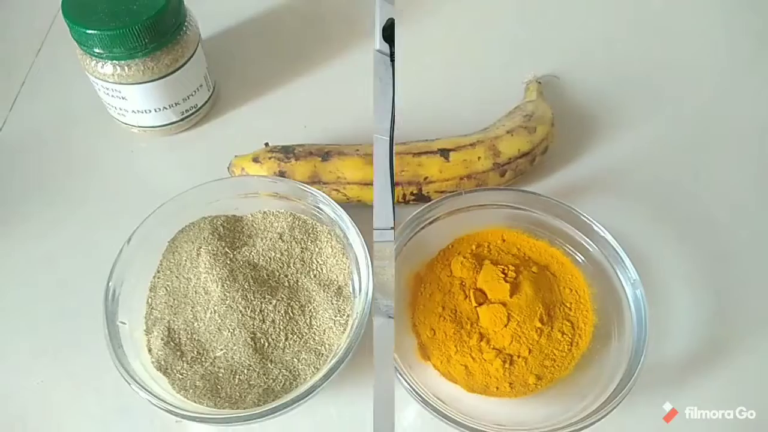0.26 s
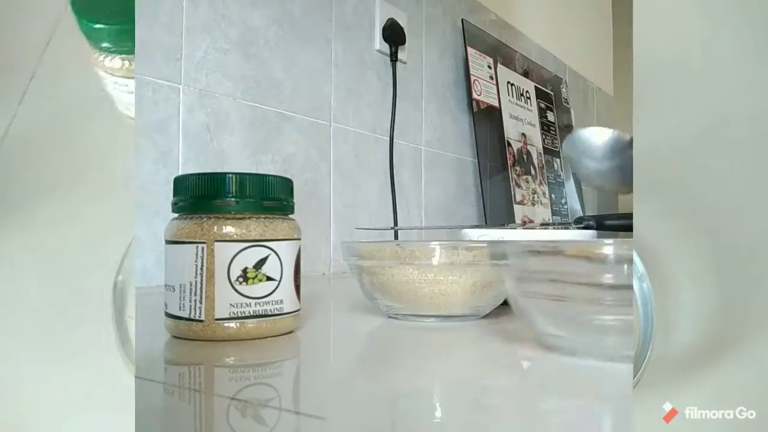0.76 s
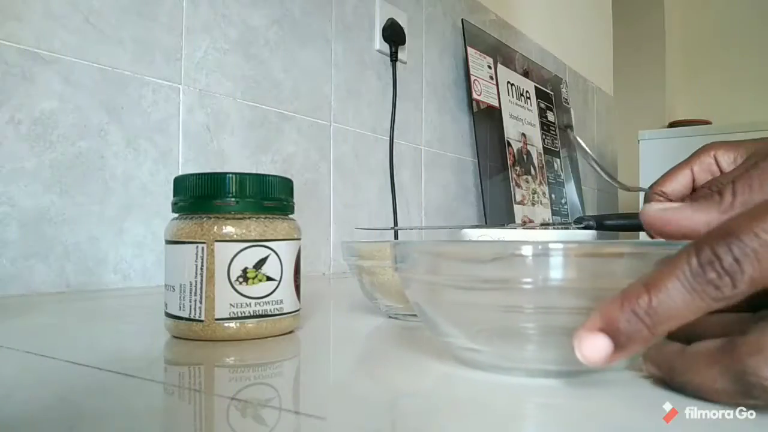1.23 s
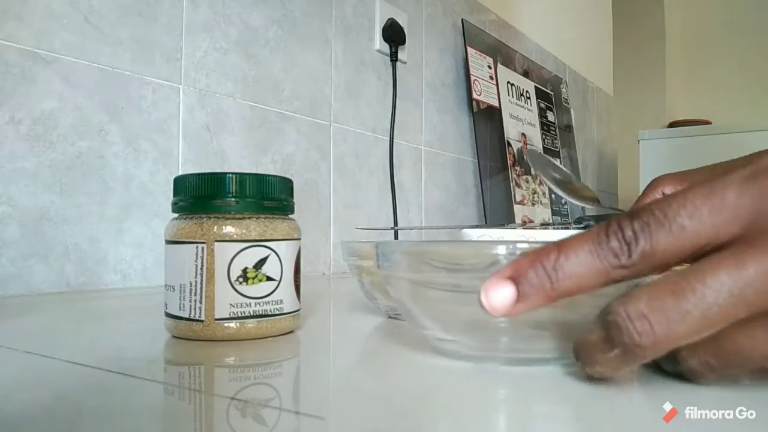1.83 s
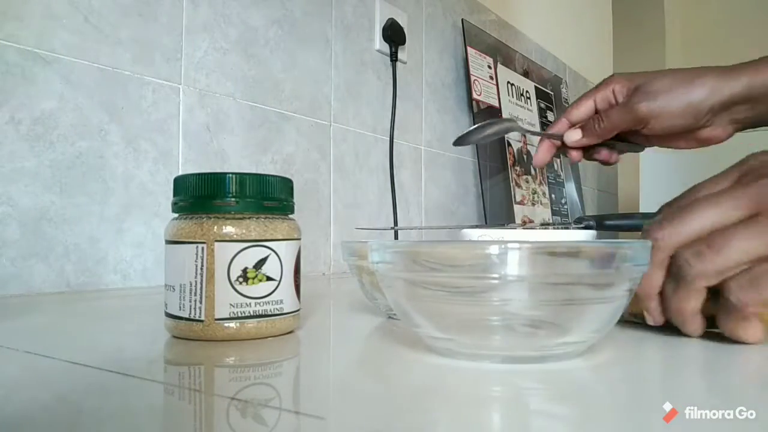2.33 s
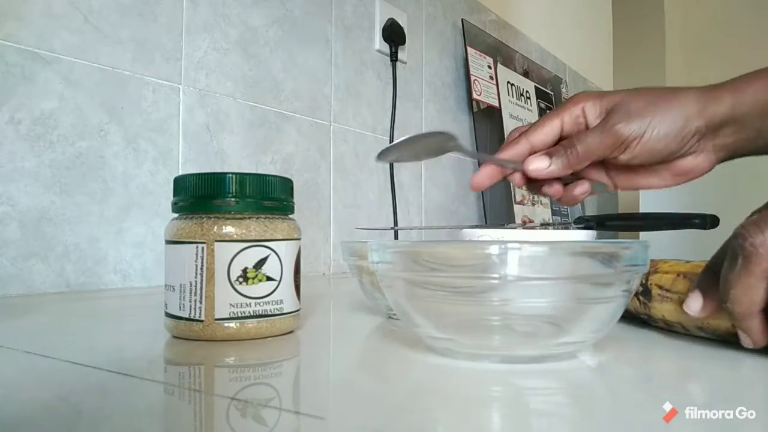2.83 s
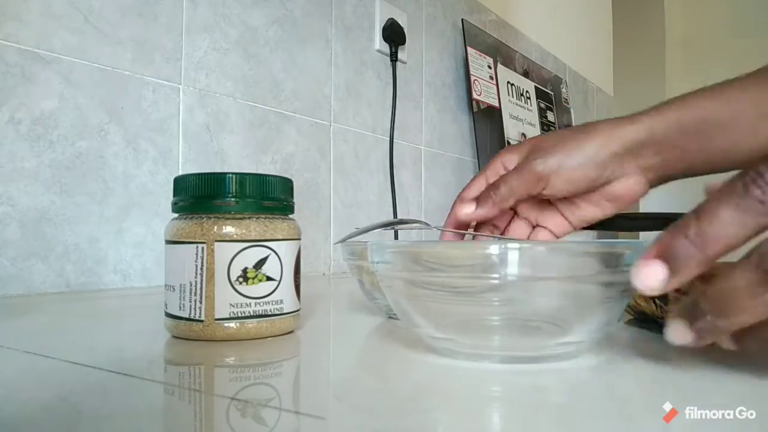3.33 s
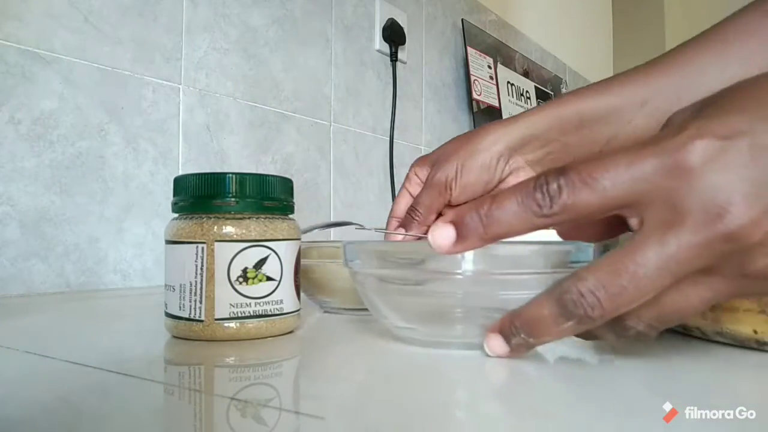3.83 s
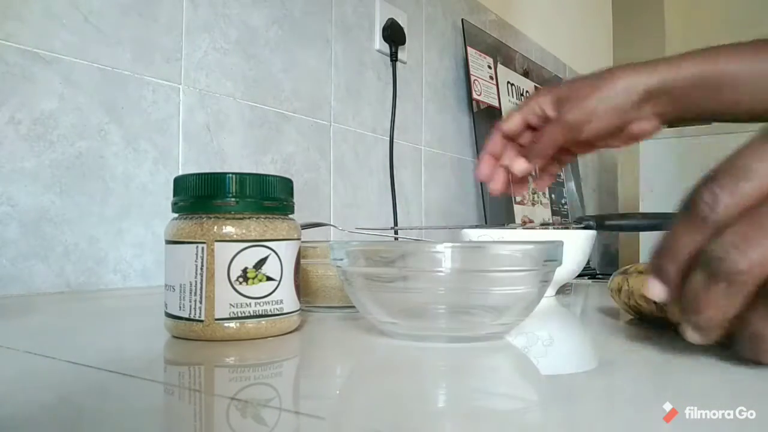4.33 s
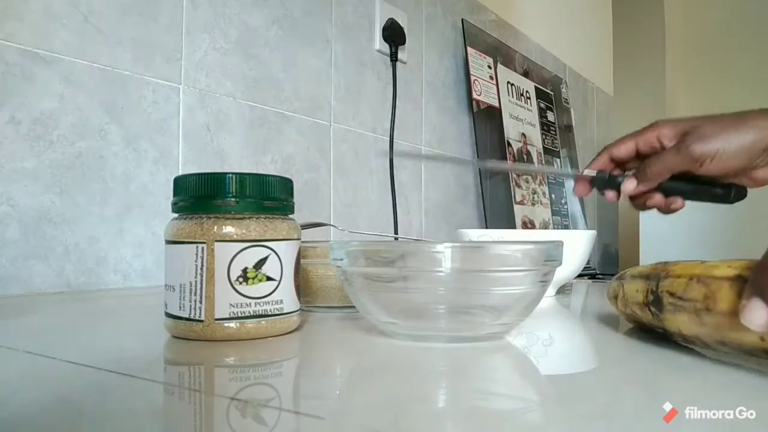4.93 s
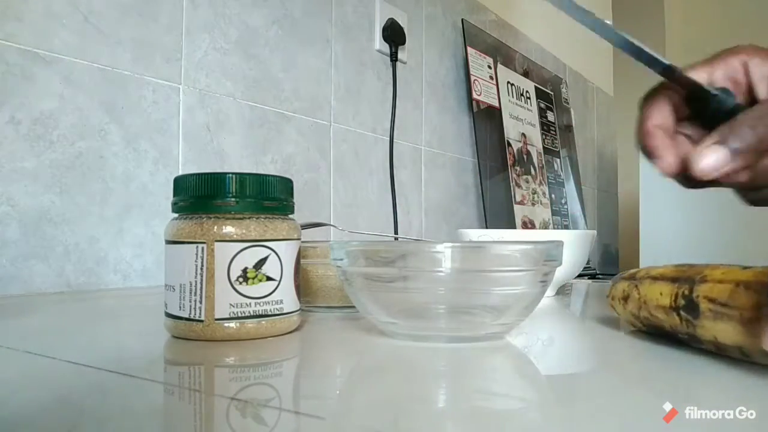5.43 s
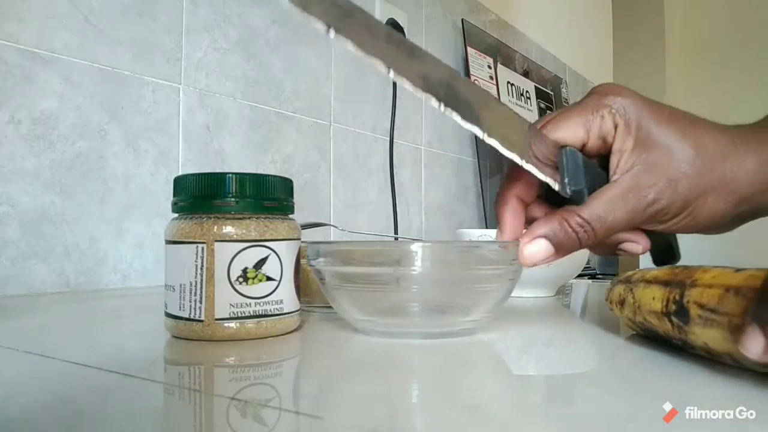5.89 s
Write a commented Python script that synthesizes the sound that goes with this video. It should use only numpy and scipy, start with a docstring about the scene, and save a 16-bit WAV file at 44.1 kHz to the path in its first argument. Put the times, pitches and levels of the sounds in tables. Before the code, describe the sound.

A glass bowl knocks and slides on a tiled counter, then a metal spoon clatters and a knife clinks over a faint low hum.

```python
"""First comes a wavering low hum with microphone hiss; it is cut for a moment and fades in again. Hands slide a
glass bowl over a tiled kitchen counter, drop a spoon onto that bowl and lift a knife off another. Knocks and
gritty rubbing make each thing ring at its own pitches, called modes. Small pings and a faint low note come and
go, and a small hard room adds a short echo."""
import sys
import numpy as np
from scipy import signal
from scipy.fft import rfft, irfft, next_fast_len
from scipy.io import wavfile
from scipy.ndimage import uniform_filter1d

SR = 44100
rng = np.random.default_rng(int(sys.argv[2]) if len(sys.argv) > 2 else 0)


def bounce(signal):
    """Save signal as a 16-bit WAV file at the path given by the first command-line argument."""
    frames = np.transpose(np.atleast_2d(signal))
    limited = np.clip(frames, -1, 1)
    pcm = np.round(limited * 32767).astype(np.int16)
    wavfile.write(sys.argv[1], SR, pcm)


N = 271435

# the room's lowest resonances (pitch [Hz], width [Hz], relative level [dB])
HUM_MODES = [(55, 25, -23.5), (70.5, 4.7, 4.5), (105.76, 14, 1), (142.4, 31, -2.5), (180.2, 36, -6.5),
             (291.5, 35, -22.5)]
# peaks of the deep hum, and the course of the upper hum (time [s], level [dB])
DEEP_SWELLS = [(.22, -32.5), (.65, -45), (1.13, -33), (1.68, -46), (2.3, -43.5), (2.86, -42.5),
               (3.63, -35.5), (3.9, -45), (4.62, -33.5), (5.05, -37.5), (5.3, -37), (5.74, -38),
               (6.12, -41)]
UPPER_HUM = [(0, -53), (.1, -54), (.24, -36.5), (.58, -44.5), (.9, -37.5), (1.55, -36.5), (2.2, -38),
             (2.9, -34.5), (3.8, -40.5), (4.4, -36.5), (4.6, -31.5), (4.8, -40), (5.05, -32), (6.15, -40.5)]
# tone colour of the hiss and of each kind of contact noise (frequency [Hz], relative level [dB])
HISS_COLOUR = [(20, -2), (200, 5), (500, 2.5), (900, -6), (2000, -10), (5000, -11.5), (12700, -15),
               (12950, -31), (17000, -32)]
TILE_GRIT = [(200, -30), (350, -5), (700, 1.5), (1800, 3), (3000, -9), (4800, -13.5), (5500, -17),
             (8800, -28.5), (10000, -81.5), (20000, -76.5)]
DULL_GRIT = [(300, -62), (650, 11), (1700, 14.5), (2400, -42), (4000, -49), (20000, -62)]
STEEL_GRIT = [(250, -32.5), (400, -3), (1500, -3), (4000, -3.5), (9000, 0), (14000, -10), (15000, -15.5),
              (20000, -13)]
# small lone rings (time [s], level [dB], pitch [Hz], ring time [s]); a ring time is a fade of 60 dB
PINGS = [(0.129, -65.5, 4600, 0.4), (0.321, -49.5, 4546, 0.44), (.38, -51.5, 1014, 0.13),
         (1.80, -57, 2130, 0.14), (1.946, -46, 4120, 0.099), (2.41, -47, 540, .1),
         (2.41, -57.5, 3170, 0.17), (2.87, -54.5, 2070, 0.27), (3.66, -51, 3240, 0.065),
         (3.70, -34, 2580, 0.065), (3.733, -53, 3200, 0.29), (4.80, -36.5, 726, 0.11),
         (4.94, -49.5, 745, 0.083), (5.42, -55, 1720, 0.093)]
# how each thing rings (pitch [Hz], relative level [dB], ring time [s])
BOWL_MODES = [(322, -18.5, 0.029), (426, -5, 0.13), (700, -7.5, 0.09), (865, 3.5, 0.043), (1158, 4, .04),
              (1406, 4, 0.049), (1599, 4, .075), (1859, -5, .06), (2201, -3, 0.045), (2640, -8.5, 0.045),
              (3183, -3, 0.02), (3584, -9, 0.037), (4160, -6.5, 0.029), (4960, -14, 0.047),
              (6030, -26, .04), (7060, -24, 0.07), (9260, -25, 0.1), (12790, -24, .09), (15420, -37.5, .04)]
HANDLE_MODES = [(720, -14, 0.051), (1003, -0.5, 0.02), (1276, 3, 0.052), (1560, 3, 0.03), (1890, -25, 0.46),
                (2180, -16, 0.025)]
SPOON_MODES = [(763, -24.5, 0.052), (1175, -15, .05), (1534, -15, .05), (2464, -13, 0.12),
               (3374, -11, 0.11), (4170, -24, 0.076), (4466, -9, 0.11), (5520, -13.5, 0.15),
               (5820, -6.5, 0.14), (5900, -8, .1), (6270, -12, .08), (7046, -6.5, 0.028), (7240, -10, .08),
               (7753, -8, 0.12), (8190, -20, 0.066), (8980, -9.5, 0.074), (9950, -11, 0.092),
               (10590, -13, .06), (10760, -15.5, .08), (12000, -27, 0.089), (11520, 0, 0.07),
               (11500, -14, .07), (12730, -11, .1), (12770, -9, .08), (13400, -3.5, .08), (13120, -9, .08),
               (13600, -10.5, .08), (13630, -6, 0.071), (13800, -13, 0.072), (15100, -11.5, 0.071)]
CHINA_MODES = [(1090, -32, 0.053), (1400, -6, 0.059), (1525, -4, 0.078), (2123, -13.5, 0.056),
               (2794, -19, 0.071), (3280, -21, 0.072), (3760, -14.5, 0.18), (3852, -5, 0.25),
               (5440, -19.5, 0.05), (6030, -15, 0.068), (6700, -13, 0.041), (6750, 4, 0.069),
               (7500, -17.5, 0.046), (9030, -21, 0.13), (10340, -13, 0.13), (11660, -34, .08),
               (13230, -37.5, .08), (15100, -28, .04)]
BLADE_MODES = [(687, -8, 0.072), (1547, 8, 0.056), (1680, -15, 0.046), (1864, -14, 0.061),
               (3380, -3.5, 0.41), (4210, -13.5, 0.074), (6030, -13, 0.076), (6350, -13, .07),
               (7000, -25, .06), (8870, -18, 0.1), (10100, -34, 0.072), (11800, -26, 0.076),
               (12600, -41, 0.057), (14100, -36, .07), (14600, -27, 0.032), (15800, -45, 0.068)]
# knocks on each thing (time [s], level [dB], brightness [dB per octave])
BOWL_KNOCKS = [(0.904, -31.5, -7), (0.958, -28.5, 0.5), (.986, -1.5, -1.5), (1.027, -5.5, -4.5),
               (1.947, -33, 1), (1.987, -33.5, -12), (3.215, -14, -4.5), (3.308, -11.5, -3),
               (3.683, -41.5, -21), (3.7, -39, -12), (3.868, -22.5, 2.5), (3.895, -23, -7), (3.955, -23, 3),
               (3.989, -50, 9), (4.012, -38, 8.5), (4.134, -45, 13.5), (5.96, -40.5, 5.5)]
HANDLE_KNOCKS = [(1.483, -20, 0), (1.692, -45, 0)]
SPOON_KNOCKS = [(3.215, -11, 1.5), (3.237, -12, 0), (3.256, -29.5, 2), (3.27, -13, 1.5), (3.309, -5.5, -1),
                (3.322, -7.5, -6), (3.349, -1, -2), (3.706, -43, 0), (3.959, -51, 4.5), (4.691, -51, 6.5)]
CHINA_KNOCKS = [(5.005, -15, 0.95)]
BLADE_KNOCKS = [(6.081, -28.5, 4.5), (6.086, -16, 1.2), (6.146, -21, 0.91)]
# rubbing, one list for each slide or rattle (time [s], level [dB])
BOWL_SLIDES = [
    [(.86, -59), (.9, -31.5), (.95, -30), (.96, -21.5), (1.06, -37), (1.2, -43), (1.42, -54.5)],
    [(1.88, -58.5), (1.93, -51.5), (1.96, -41.5), (2.08, -50.5), (2.14, -77)],
    [(3.68, -67), (3.75, -43.5), (3.82, -42), (3.9, -33), (3.94, -39), (3.96, -30.5), (4.07, -36),
     (4.14, -35), (4.19, -41), (4.3, -81)],
    [(5.87, -53), (5.91, -47), (6.07, -45), (6.09, -35.5), (6.15, -39.5)],
]
SPOON_RATTLES = [
    [(3.213, -26.5), (3.28, -19.5), (3.305, -21.5), (3.315, -13.5), (3.37, -16.5), (3.41, -22),
     (3.47, -36.5)],
    [(3.957, -36.5), (3.99, -40.5), (4.09, -57.5)],
]
CHINA_RATTLE = [
    [(5.003, -26.5), (5.03, -38), (5.07, -45.5)],
]
# a faint note that comes and goes (time [s], hold [s], pitch [Hz], level [dB])
LOW_NOTES = [(1.04, 0.075, 427.8, -34), (1.18, 0.13, 424, -50.5), (1.9, 0.092, 430.4, -47.5),
             (2.27, 0.12, 428.4, -52), (2.39, 0.11, 429, -46.5), (2.61, 0.033, 453, -54),
             (2.76, 0.11, 449, -50.5), (2.95, 0.11, 426, -52), (3.08, 0.05, 493, -55.5),
             (3.689, 0.034, 376.5, -41.5), (3.95, .06, 429, -36), (4.08, 0.17, 411, -56),
             (4.3, 0.025, 486, -52), (4.56, .18, 426, -50), (4.82, 0.091, 422, -50),
             (5.22, 0.046, 418.6, -48), (5.59, .06, 320, -52), (5.86, 0.08, 336.7, -55)]
# how long the room echoes (frequency [Hz], ring time [s])
ROOM_RING_TIMES = [(300, 0.29), (1500, 0.36), (5000, 0.36), (12000, .3)]


def undb(db):
    """Turn decibels into a factor to multiply by."""
    return 10 ** (np.asarray(db) / 20)


def level(x, db):
    """Set a sound's average (RMS) level."""
    return x * undb(db) / np.sqrt(np.mean(x ** 2))


def mode(x, hz, ring_s):
    """One fading vibration; a push of 1 starts it ringing at a height of 1."""
    decay, turn = np.exp(-np.log(1000) / (max(ring_s, .004) * SR)), 2 * np.pi * hz / SR
    return signal.lfilter([np.sin(turn)], [1, -2 * decay * np.cos(turn), decay * decay], x)


def colour(x, points):
    """Shape a sound's bass and treble by (frequency [Hz], level [dB]) points."""
    hz, db = np.transpose(points)
    n = next_fast_len(len(x))
    freqs = np.maximum(np.fft.rfftfreq(n, 1 / SR), 1)
    return irfft(rfft(x, n) * undb(np.interp(np.log(freqs), np.log(hz), db)), n)[:len(x)]


def waver(per_second, size=N):
    """Random steps smoothed into a drift of roughly 1 either way."""
    step = int(SR / per_second)
    steps = np.repeat(rng.standard_normal(size // step + 1), step)
    return 1.2 * uniform_filter1d(uniform_filter1d(steps, step), step)[:size]


def hum():
    """Rumble rings the room's lowest modes, each wavering alone; the deepest swell fast, ebb slowly."""
    t, out = np.arange(N) / SR, 0
    rise_db_per_s, fall_db_per_s, rest_db = 121, 39, -54
    upper_db = np.interp(t, *np.transpose(UPPER_HUM))
    deep_db = np.minimum(upper_db, rest_db)
    for s, db in DEEP_SWELLS:
        swell_db = db - np.maximum(rise_db_per_s * (s - t), fall_db_per_s * (t - s))
        deep_db = np.maximum(deep_db, swell_db)
    for hz, width, db in HUM_MODES:
        ring_s = np.log(1000) / (np.pi * width)
        ring = mode(rng.standard_normal(N), hz, ring_s)
        ring = level(mode(ring, hz, ring_s / 2), db - 5.5)
        out = out + ring * undb((upper_db if hz > 95 else deep_db) + 2 * waver(per_second=5))
    return out


def microphone_hiss():
    """The microphone's own steady noise."""
    return level(colour(rng.standard_normal(N), HISS_COLOUR), db=-57.5)


def pings():
    """Short single rings here and there, each from one tiny push."""
    out = 0
    for s, db, hz, ring_s in PINGS:
        push = np.zeros(N)
        push[int(s * SR)] = undb(db)
        out = out + mode(push, hz, ring_s)
    return out


def rub_level(rubs):
    """How hard a thing is rubbed at each moment, in dB; silent between rubs."""
    db, t = np.full(N, -200.0), np.arange(N) / SR
    for rub in map(np.array, rubs):
        inside = (t >= rub[0, 0]) & (t <= rub[-1, 0])
        db[inside] = np.interp(t[inside], *rub.T)
    return db


def cracks(n, hits, knock_db, crack_db):
    """A burst of noise for each knock; with harder knocks it grows faster than the ring does."""
    growth, hard_knock_db = 1.38, -13.5
    blows = np.zeros(n)
    blows[hits] = undb(growth * (knock_db - hard_knock_db) + hard_knock_db + crack_db)
    age = np.arange(400) / (0.0013 * SR)  # the burst peaks after 1.3 ms
    return np.convolve(blows, np.e * age * np.exp(-age))[:n] * rng.standard_normal(n)


def knock_and_rub(modes, knocks, rubs, grit, spot_db, crack_db, grit_db, centre_hz,
                  brighten=0, wander_db=2):
    """Knocks and uneven scraping grains ring the modes; each knock also cracks, each rub also hisses."""
    times, knock_db, knock_bright = np.transpose(knocks)
    start = int(np.floor(4 * times[0] - .4) * SR / 4)  # work only on the stretch around the knocks
    end = min(int(np.ceil(4 * times[-1] + 2) * SR / 4), N)
    hits, n = (times * SR).astype(int) - start, end - start
    rub_db, firm_db = rub_level(rubs)[start:end], -37.5
    rub_bright = np.clip(brighten * (rub_db - firm_db), -13, 1.5)
    grains = rng.standard_normal(n)
    rough_db = 1.5 * np.minimum(rng.exponential(size=n), 4) + 1.8 * waver(per_second=140, size=n)
    grains = level(grains * undb(rough_db), 0)
    gains = undb(np.array(modes)[:, 1])
    spots = spot_db * rng.standard_normal((len(hits), len(modes)))  # each blow lands on another spot
    touch = np.hanning(int(0.0014 * SR))  # a blow lasts 1.4 ms, so the ring takes a moment to build
    rings = 0
    for k, (hz, _, ring_s) in enumerate(modes):
        octaves = np.log2(hz / centre_hz)
        height = max(octaves, -.4)
        # a long ring stores more of a steady push, so it is pushed more gently
        push = np.sqrt(4 * np.log(1000) / (ring_s * SR))
        # with brighten set, a light rub wakes only the middle modes
        reach_db = rub_bright * np.where(rub_bright < 0, 3 * abs(octaves), height)
        # the contact wanders over the thing, waking now one mode, now another
        force = push * grains * undb(rub_db + reach_db + wander_db * waver(per_second=18, size=n))
        blow = 2 * touch / touch.sum() * np.cos(2 * np.pi * hz / SR * np.arange(len(touch)))
        for i, strength in zip(hits, undb(knock_db + knock_bright * height + spots[:, k])):
            force[i:i + len(blow)] += strength * blow[:n - i]
        rings = rings + gains[k] * mode(force, hz, ring_s)
    contact = cracks(n, hits, knock_db, crack_db) + grains * undb(rub_db + grit_db + 1.6 * rub_bright)
    # a harder contact lifts the high part of the noise
    brightness = rub_bright.copy()
    for i, bright in zip(hits, knock_bright):
        brightness[i:i + 400] = bright
    low = signal.sosfilt(signal.butter(2, 0.69 * centre_hz, fs=SR, output="sos"), contact)
    noise = colour(low + (contact - low) * undb(1.3 * brightness), grit)
    return np.pad(rings / np.sqrt(np.sum(gains ** 2)) + noise, (start, N - end))


def glass_bowl():
    """Glass bumps and scrapes over tile; the firmer the rub, the brighter it sounds."""
    return knock_and_rub(BOWL_MODES, BOWL_KNOCKS, BOWL_SLIDES, TILE_GRIT, spot_db=1.5,
                         crack_db=7.5, grit_db=-8, centre_hz=1590, brighten=1.8, wander_db=5.5)


def low_note():
    """A rough tone that swells, holds and dies away while its pitch sags."""
    rise_s, fade_db_per_s, sag_hz_per_s = 0.015, 253, 20
    wobble = level(uniform_filter1d(rng.standard_normal(N), int(SR / 60)), 0)
    t, out = np.arange(N) / SR, np.zeros(N)
    for s, hold, hz, db in LOW_NOTES:
        span = slice(int(s * SR), int((s + hold + .4) * SR))
        age = t[span] - s
        shape = np.clip(age / rise_s, 0, 1) * undb(db - fade_db_per_s * np.maximum(age - hold, 0))
        out[span] += shape * np.sin(2 * np.pi * (hz - sag_hz_per_s * age / 2) * age)
    return np.sqrt(2) * out * (1 + 1.1 * wobble)


def handle():
    """A handle takes two dull knocks, the second much softer."""
    return knock_and_rub(HANDLE_MODES, HANDLE_KNOCKS, [], DULL_GRIT,
                         spot_db=4, crack_db=2, grit_db=0, centre_hz=1300)


def spoon():
    """A dropped steel spoon bounces and rattles, ringing its many high modes."""
    return knock_and_rub(SPOON_MODES, SPOON_KNOCKS, SPOON_RATTLES, STEEL_GRIT,
                         spot_db=4, crack_db=-3.5, grit_db=0.5, centre_hz=5900)


def china():
    """One knock makes china clink and briefly rattle."""
    return knock_and_rub(CHINA_MODES, CHINA_KNOCKS, CHINA_RATTLE, STEEL_GRIT,
                         spot_db=.5, crack_db=-11, grit_db=-11, centre_hz=5000)


def knife_blade():
    """Three quick knocks ring the blade as the knife is lifted."""
    return knock_and_rub(BLADE_MODES, BLADE_KNOCKS, [], TILE_GRIT,
                         spot_db=.5, crack_db=4, grit_db=0, centre_hz=2000)


def room(x):
    """Hard walls add dense echoes, made of bands of noise that each fade at their own rate."""
    t, echo = np.arange(int(.7 * SR)) / SR, 0
    freqs, ring_times = np.transpose(ROOM_RING_TIMES)
    build_s, echo_db = 0.0021, -7.5
    for hz in 250 * 2 ** np.arange(0, 6.1, .5):
        ring_s = np.interp(np.log(hz), np.log(freqs), ring_times)
        band = signal.butter(2, [hz / 2 ** .25, hz * 2 ** .25], "band", fs=SR, output="sos")
        echo = echo + signal.sosfilt(band, rng.standard_normal(len(t))) * undb(-60 * t / ring_s)
    echo = echo * np.clip(t / build_s, 0, 1)
    return x + signal.fftconvolve(x, echo / np.sqrt(np.sum(echo ** 2)))[:N] * undb(echo_db)


def scene():
    """The kitchen sounds echo in the room, over the hum and hiss."""
    things = glass_bowl() + handle() + spoon() + china() + knife_blade()
    return (hum() + microphone_hiss() + room(pings() + things + low_note()))[None]


def record(dry):
    """The microphone drops the deepest bass and rounds peaks; the sound cuts out once; the top is cut."""
    t = np.arange(N) / SR
    cut_s, resume_s, fade_s, resume_db, top_hz = 0.825, 0.85, 0.14, -23.5, 15800
    fade_in = (t > resume_s) * undb(resume_db * np.exp(-np.maximum(t - resume_s, 0) / fade_s))
    volume = uniform_filter1d((t < cut_s) + fade_in, size=150)
    thinned = signal.sosfilt(signal.butter(3, 48, "high", fs=SR, output="sos"), dry)
    rounded = np.tanh(thinned * volume)
    return .95 * signal.sosfilt(signal.ellip(12, .2, 85, top_hz, fs=SR, output="sos"), rounded)


dry = scene()
out = record(dry)
bounce(out)
```